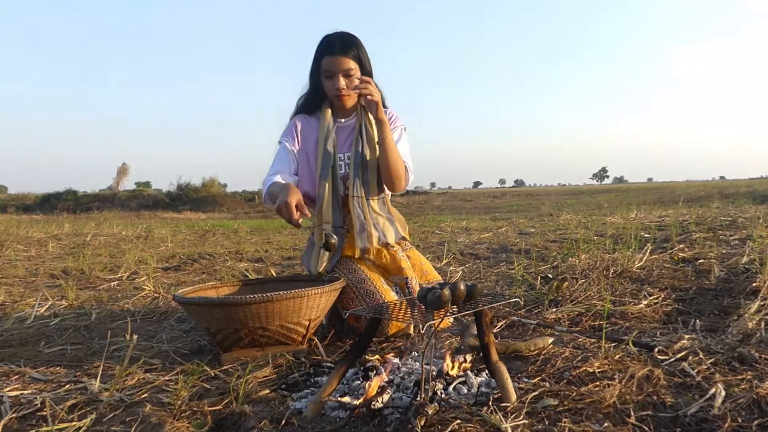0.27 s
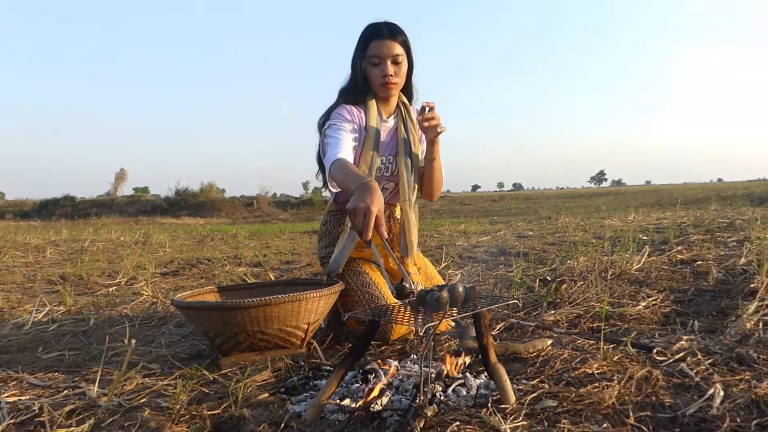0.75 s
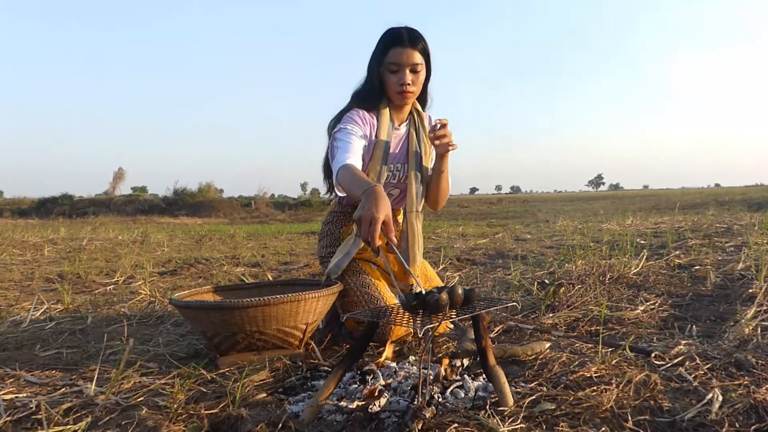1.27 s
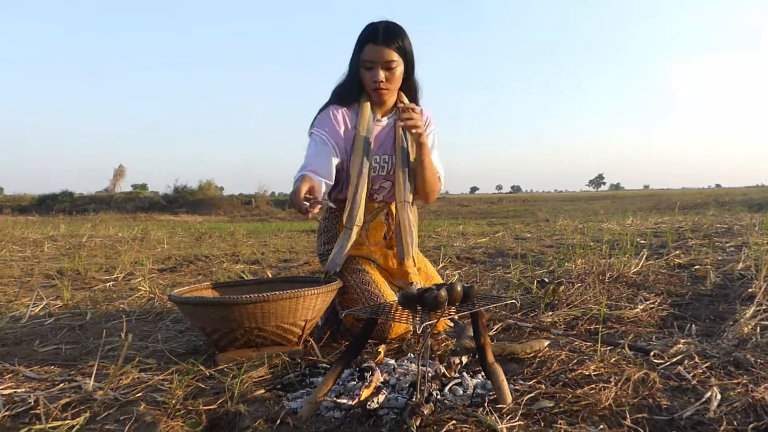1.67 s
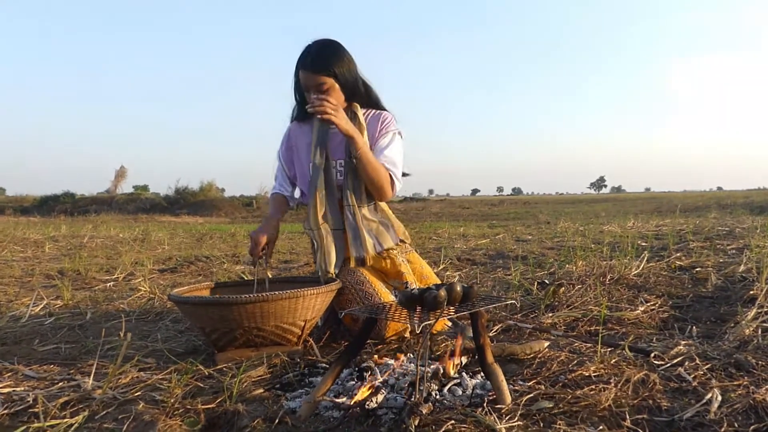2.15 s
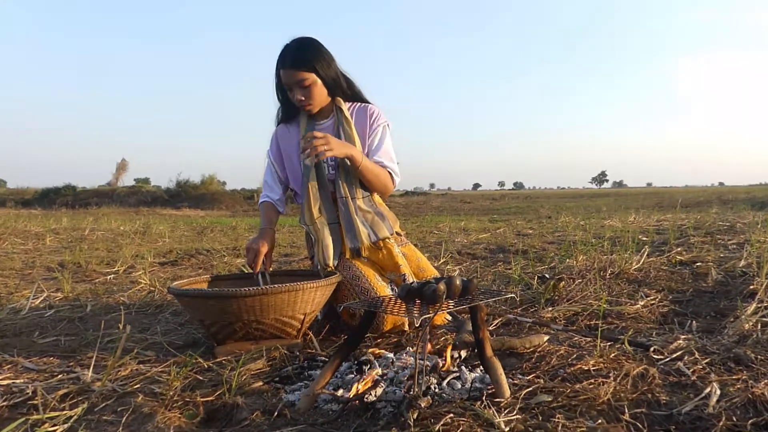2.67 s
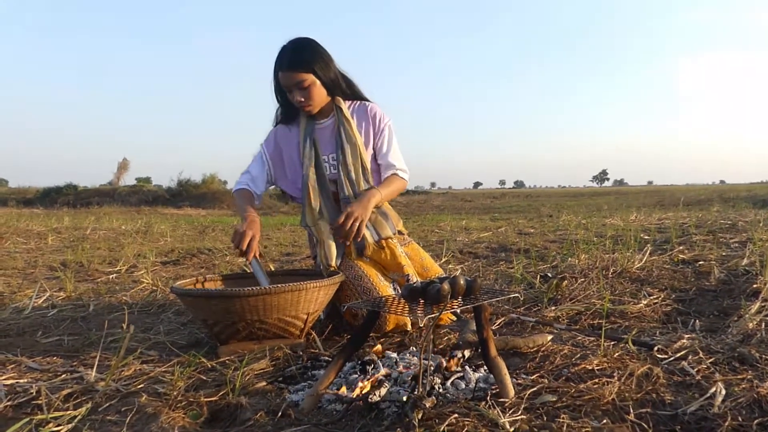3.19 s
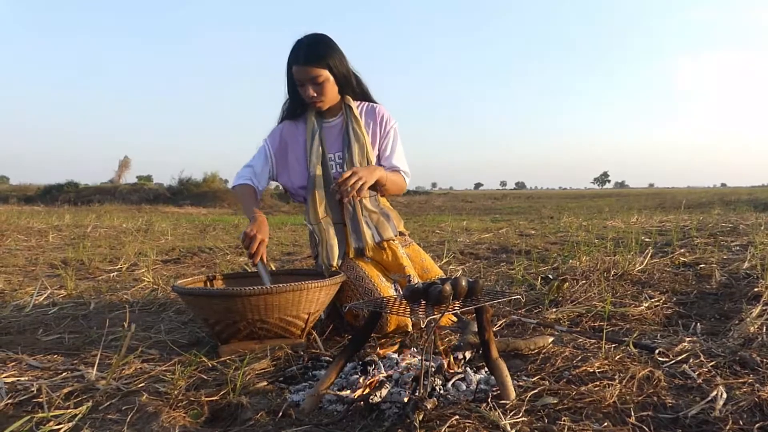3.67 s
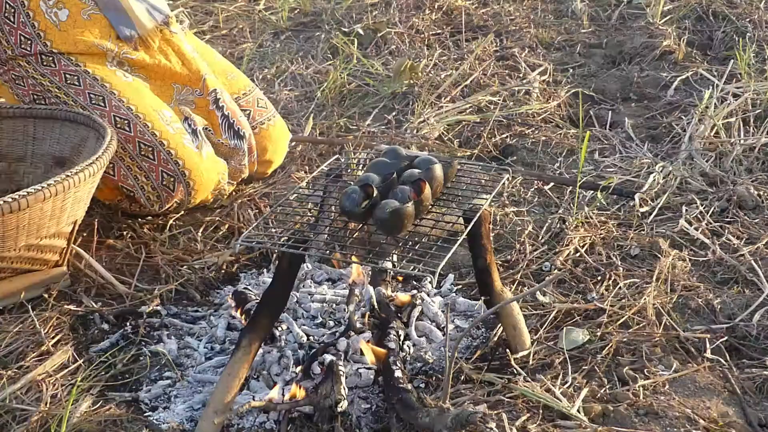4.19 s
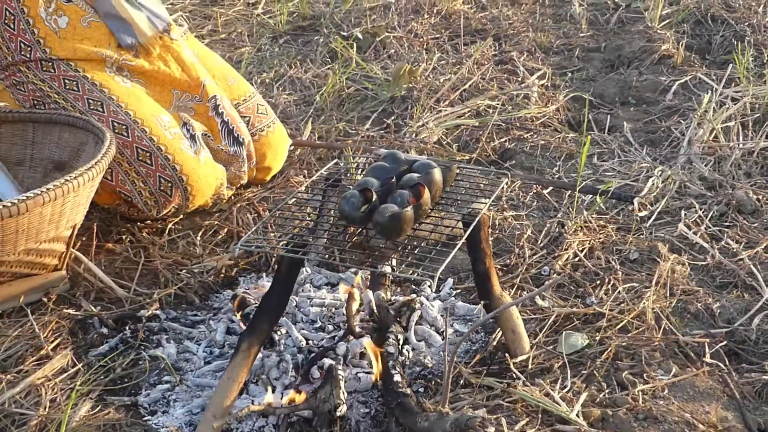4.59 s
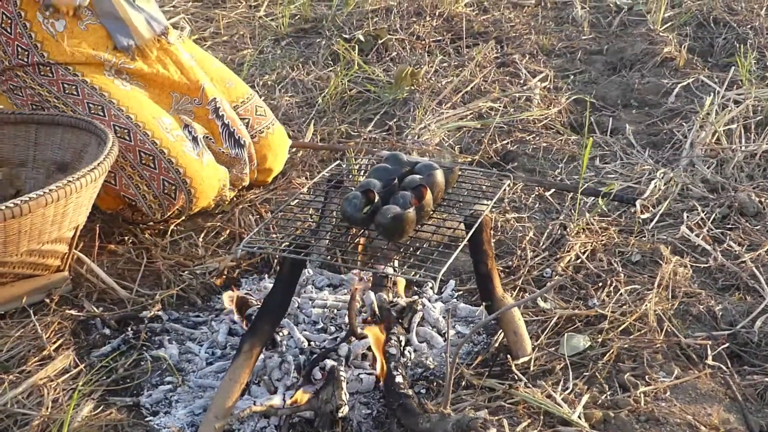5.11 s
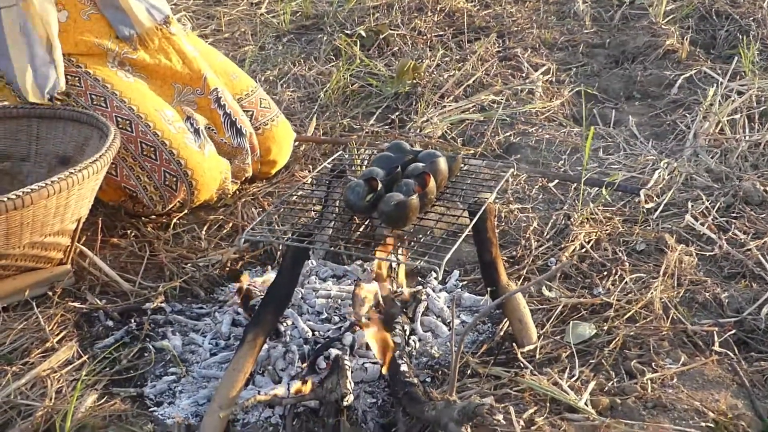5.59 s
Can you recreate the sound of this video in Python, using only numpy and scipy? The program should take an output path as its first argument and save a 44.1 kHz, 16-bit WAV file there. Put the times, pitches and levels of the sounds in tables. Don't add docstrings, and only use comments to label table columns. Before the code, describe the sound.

In an open field, small birds whistle short sliding notes and tick over soft wind, a faint drone and hiss. Metal tongs stir hard shells in a wicker basket, sparse at first, then in clattering, scraping bursts. After a quarter second of silence the air fades back in and a closer stereo microphone catches denser, louder clacks and ringing taps, with a soft puff of wind.

```python
import sys
import numpy as np
from scipy import signal
from scipy.fft import rfft
from scipy.io import wavfile
from scipy.ndimage import uniform_filter1d

SR = 44100
rng = np.random.default_rng(int(sys.argv[2]) if len(sys.argv) > 2 else 0)


def dump_mix(stems):
    frames = np.atleast_2d(stems).T
    limited = np.clip(frames, -1, 1)
    pcm = np.round(limited * 32767).astype(np.int16)
    wavfile.write(sys.argv[1], SR, pcm)


def convert_level_to_amplitude(level_db):
    exponent = np.asarray(level_db, float) / 20
    return 10 ** exponent


N = 257984

# f/Hz, level/dB per Hz
WIND_COLOUR = [(12, -61), (20, -47.5), (124, -4), (393, -7), (479, -2.5), (583, -12.5), (690, -17),
               (816, -10.5), (1140, -17), (1390, -15.5), (2580, -23.5), (5360, -26), (10200, -25),
               (15200, -32.5), (16500, -40.5)]
WIND_DB = -57.5
# f/Hz, likeness (-1 to 1)
WIND_LIKENESS = [(60, -0.24), (150, -0.63), (380, -0.76), (950, -0.62), (2380, -0.15), (5980, 0.38),
                 (15000, 0.45)]
# f/Hz, width/Hz, level/dB
DRONE = [
    (479, 60, -68),
    (807, 70, -79),
    (5240, 500, -78),
]
# t/s, bass lift/dB
PUFF = [
    (5.05, -1.5),
    (5.15, 10.5),
    (5.22, -1),
    (5.36, 22),
    (5.5, 8.5),
    (5.7, 1),
]
# t/s, level/dB
CLOSE_AIR = [
    (4.435, -90),
    (4.44, -32),
    (4.47, -7.5),
    (4.55, -3.5),
    (4.7, 3),
    (5.3, 3),
    (5.85, 5),
]
WIDE_AIR_DB, CHANGE_S, CHANGE_DB_PER_S = 3.5, 4.199, 1501.5

# t/s, length/s, middle f/Hz, end minus start f/Hz, level/dB
SLIDES = [(.63, .024, 3270, 300, -69), (1.262, .084, 3460, 200, -66), (1.5, .23, 3610, 680, -69),
          (1.86, .14, 3500, -250, -68), (2.69, .11, 3750, 50, -62), (3.65, .025, 4250, 500, -65),
          (3.695, .03, 4300, -1100, -65), (3.792, .022, 3450, 450, -62), (3.85, .028, 4450, -800, -63),
          (5.252, .016, 5350, -400, -60), (5.292, .014, 5450, -400, -58), (1.36, .026, 6300, -2600, -64),
          (.03, .03, 3350, 300, -68)]
# t/s, length/s, top f/Hz, end minus start f/Hz, level/dB
CHIRPS = [(.205, .077, 3640, 100, -59.5), (.666, 0.07, 3550, -170, -61.5), (.822, .03, 3380, 300, -69),
          (1.009, 0.064, 3600, -140, -60), (1.353, 0.089, 3700, 91, -63), (1.579, 0.051, 3600, -10, -57.5),
          (1.764, 0.066, 3680, -36, -61), (1.99, 0.043, 3760, -50, -61), (2.168, 0.07, 3770, -50, -60),
          (2.378, 0.062, 3850, -350, -56), (2.553, 0.078, 3900, 303.5, -57),
          (2.922, 0.066, 3950, -100, -50.5), (3.098, 0.05, 4030, -50, -50), (3.26, 0.091, 3900, 454, -53),
          (3.42, 0.076, 4110, 0, -55), (5.235, 0.023, 3820, -100, -62), (5.63, 0.041, 3790, -110, -58)]
# t/s, length/s, top f/Hz, end minus start f/Hz, level/dB
TWEETS = [
    (2.762, 0.038, 4300, -700, -55),
    (3.576, .046, 4670, -80, -47),
    (3.722, 0.017, 3640, 522, -59),
    (3.732, 0.05, 4610, -50, -49),
    (3.808, 0.036, 4600, 500, -62),
    (3.88, 0.043, 3920, 500, -52.5),
    (3.9, 0.036, 4670, -300, -50.5),
    (3.953, 0.044, 3800, 370, -58),
]
CHIRP_ARCH_HZ_PER_S, TWEET_ARCH_HZ_PER_S = 9500, 26000
# t/s, peak level/dB
TICKS = [(.194, -45), (.221, -48), (0.392, -42), (.4125, -49), (1.1728, -36), (1.207, -42), (1.2793, -45),
         (1.384, -41.5), (1.419, -49), (1.5873, -53), (1.7, -47.5), (1.774, -41.5), (2.144, -51.5),
         (2.744, -41.5), (3.76, -40), (3.949, -46)]
TICK_HZ, TICK_TOP_HZ, TICK_TOP_DB, TICK_T60 = 3900, 8700, -2.5, .01

# t/s, peak level/dB, main ring f/Hz, basket thud level/dB re peak,
# bright edge level/dB re peak Short contacts, with lone clicks away from the basket (1.3484, 1.515, 2.0312 s)
# and a bright crackle (1.301 s)
TAPS = [(1.0095, -35.5, 1500, -25, -2), (1.3484, -26.5, 1480, -62, -46), (1.515, -44, 3270, 4, 8),
        (2.4004, -31.5, 3200, -23, -9), (2.0312, -33.5, 4000, -17, -17.5), (2.7634, -37, 2360, -21, -21),
        (2.79, -20.5, 1500, -6, -45), (2.809, -29, 1020, -13, -43), (2.9195, -25.5, 2980, -16, -33),
        (1.301, -46, 9000, -40, 25), (3.0389, -25.5, 1230, -8.5, -53), (3.455, -36, 900, 0, -13),
        (3.6114, -35.5, 1440, -19, -14.5), (4.759, -36, 1050, -17, -24.5), (4.8045, -35, 3050, -15, -10),
        (4.9129, -11.5, 2350, -32, -9.5), (4.9318, -13.5, 3300, -22, -14.5), (4.9897, -15.5, 3670, -7, -29),
        (5.0635, -26, 2930, -15, -19), (5.428, -13, 3660, -28, -3.5), (5.4985, -14.5, 2830, -36, -32),
        (5.5315, -30, 2530, -4, -16), (3.549, -14, 4760, -39, -20), (5.6086, -31, 1786, 3, -34)]
KNOCKS = [(2.722, -38.5, 1290, 1, -27), (3.0608, -27.5, 2970, -34, -6.5), (3.0698, -36, 2430, -8, -28),
          (3.099, -30.5, 1950, -34, 1.5), (3.3471, -29, 1280, 6, 8), (3.3804, -26, 1260, -17, -6),
          (3.4994, -33, 4600, -5, -6), (3.5481, -16, 1640, 0.5, -15), (3.5776, -36.5, 1940, -3, -9),
          (.335, -49.5, 1210, -3, -42), (3.989, -32, 4880, -1.5, -4), (4.6515, -22.5, 3840, -6.5, -17.5),
          (4.6706, -29, 1565, -6, -22), (4.7077, -33, 2810, -16, -3), (4.7861, -27, 2990, -10, 5.5),
          (4.8173, -24.5, 3260, -7, -9), (4.8859, -28, 2480, 10, -29), (5.0008, -32, 2520, -15, -10),
          (5.1924, -34, 1460, -1, 0), (5.4588, -22, 1640, -5, -5), (5.6001, -34.5, 1690, -4, -40),
          (4.7425, -35, 2900, -21, -25), (5.8205, -19, 4700, -1.5, -0.5), (5.838, -20, 4630, -11, -3)]
CLACKS = [(2.2723, -27, 1960, 0, -4), (2.333, -22, 2000, -8, 7.5), (2.9136, -19.5, 6070, -16.5, -4.5),
          (2.9309, -27.5, 1295, -18, -16), (3.13, -32.5, 3610, -5, -33), (3.1522, -41, 2700, 4, -18),
          (3.3156, -35, 1540, -2, 5), (3.6306, -37, 1030, 4, -39), (4.0256, -32.5, 4640, -8, 9),
          (4.481, -33.5, 4070, -2.5, 5.5), (4.6845, -37.5, 4340, -4.5, -15.5),
          (4.8553, -26, 3650, -10, -14), (4.9069, -21, 2480, -21, -21), (5.0847, -22, 2160, -10.5, -10),
          (5.148, -14, 2980, -14, -15), (5.327, -28, 1100, 25, 14), (5.341, -31, 2900, -30, -31),
          (5.3823, -36.5, 1810, -3, -28), (5.4113, -25, 5830, -23, 3), (5.483, -37, 1540, -21, -3),
          (5.5138, -16, 1780, 1.5, -11), (5.5576, -16, 620, -5, -9), (5.7423, -16.5, 3900, -4.5, -8),
          (5.7785, -20.5, 3900, -8, -2.5)]
GRINDS = [(2.288, -34.5, 900, -8, -10), (2.3603, -36, 6800, 1.5, -1), (2.4763, -32.5, 1420, 1.5, 4),
          (2.54, -35.5, 1740, -6, -16), (2.637, -15.5, 1560, -5, -1), (2.6785, -25.5, 3700, -14, -12.5),
          (2.9684, -30, 1210, -5, -5), (3.3642, -28, 4500, -3, -5), (3.3934, -26, 1237, -1, -11),
          (3.4241, -26.5, 1000, -9, 0.5), (4.0465, -38, 4900, -11, -6), (4.078, -32, 4370, -21, 2),
          (4.105, -27.5, 1610, -13, 3), (4.6142, -36.5, 1070, -41, -3), (4.7256, -32.5, 2850, -11, -16),
          (4.8415, -23.5, 2220, -22, -12), (4.9667, -44, 1000, -34, 11), (4.9789, -26, 6800, -24, 7),
          (5.0518, -21, 4400, -11, -3), (5.3149, -27.5, 1060, -11, -8.5), (5.4492, -25.5, 3770, -27, -9),
          (5.7046, -32, 870, 15, -14), (5.7925, -23.5, 6100, 1, 4), (5.8091, -23.5, 3750, -7, -5)]
MORE_TAPS = [(1.0145, -38, 3150, -15, -16), (1.033, -43, 1500, -18, -14), (2.296, -47, 6100, -30, -17),
             (2.418, -45, 6200, -30, -15), (2.6465, -27, 1130, -12, -3), (2.825, -46, 3680, -25, -20),
             (2.955, -31, 1290, -13, -20), (2.996, -43, 3900, -25, -10), (3.135, -45, 6470, -22, -10),
             (5.3475, -37, 3520, -25, -6), (5.362, -39, 2480, -10, -8), (3.228, -43, 6030, -32, -14),
             (3.514, -44, 4500, -25, -11), (3.527, -47, 1500, -15, -20), (3.561, -25.5, 1700, 7, -25),
             (4.038, -41, 1500, -17, -8), (4.121, -41, 1500, -10, -15), (4.143, -43, 3200, -20, -21),
             (4.156, -52, 1700, -2, -19), (4.646, -28, 2970, -23, -4), (4.967, -27, 1730, -29, -12),
             (5.018, -29, 1830, -26, -19), (5.1535, -13.5, 3850, -9, -7.5), (5.1545, -15.5, 1840, -32, -15),
             (5.286, -49, 6550, -20, 1), (5.516, -15.5, 4600, -27, -26), (5.7035, -35.5, 4000, -30, -13),
             (5.7195, -42, 4460, -30, -18), (4.717, -41, 3080, -25, -25), (3.283, -46.5, 860, 16, -30)]
TAP_T60, KNOCK_T60, CLACK_T60, GRIND_T60, MORE_TAP_T60 = .011, .028, .034, .044, .012
# f/Hz, level/dB
SHELL_COLOUR = [(300, -27.5), (1250, 0), (5000, -5), (8500, -42.5), (16000, -62)]
BASKET_COLOUR = [(90, -41.5), (300, -7), (750, -1), (1600, -14), (4000, -60.5)]
RIM_COLOUR = [(2500, -31.5), (6000, -6), (11000, -10.5), (16000, -21)]
# f/Hz, width/Hz, level/dB
TONGS = [
    (1500, 300, -10.5),
    (2430, 160, -2),
    (3710, 27, 0.5),
    (3900, 39, -9.5),
    (4900, 35, -24.5),
]

# peak t/s, length/s, scrape level/dB, bright part level/dB re scrape, basket creak level/dB re scrape
DRAGS = [(1.018, 0.049, -41, 2, -19), (2.387, 0.15, -40.5, -12, -6), (2.56, 0.18, -48.5, -7, -1),
         (2.714, 0.22, -42.5, -12, -26), (2.9, 0.11, -63.5, 1, 12.5), (3.088, 0.28, -41.5, -10, -16),
         (3.25, 0.2, -61.5, -1, 8), (3.408, 0.11, -30.5, -23, -18), (3.453, 0.075, -34, 3, -31),
         (3.566, 0.16, -39, -11, -2.5), (3.746, 0.14, -46, -7, -11), (4.062, 0.085, -46, 3.5, -20),
         (4.108, 0.28, -37.5, -9, -5.5), (4.678, 0.15, -32.5, -7, -10), (4.828, 0.24, -38, -16, -25),
         (4.898, 0.12, -40, -10, 11.5), (4.988, 0.091, -29, -6, -4.5), (5.2, 0.08, -38, -32, -4),
         (5.37, 0.033, -38, -8, 6.5), (5.44, 0.27, -40.5, -4.5, -21), (5.508, 0.25, -42, -26, 1.5),
         (5.753, 0.4, -52.5, -15, 9), (5.85, 0.11, -25, -10, -3.5)]
DRAG_FADE_DB = 16.5
# t/s, length/s, f/Hz, level/dB
RUBS = [(1.01, 0.022, 3900, -45.5), (1.01, 0.024, 1500, -49), (2.295, 0.021, 6160, -57),
        (2.332, 0.013, 3900, -33), (2.475, 0.041, 1557, -57), (2.419, 0.024, 6150, -63),
        (2.68, 0.015, 1254, -39), (2.9193, 0.008, 3744, -21.5), (3.426, 0.026, 986, -40),
        (3.471, .026, 984, -51), (3.436, 0.028, 5950, -45), (3.442, 0.025, 4680, -46),
        (4.04, 0.09, 4800, -54), (4.07, 0.063, 7430, -49), (4.033, 0.061, 6100, -58),
        (4.114, 0.033, 1005, -47), (4.759, 0.022, 1036, -50), (5.431, 0.024, 8870, -45),
        (5.452, 0.022, 3720, -37), (5.52, 0.025, 3900, -38.5), (5.751, 0.014, 3900, -31)]
RUB_WAVER_DB = 4
# t/s, f/Hz, peak level/dB
PINGS = [(2.272, 3170, -37), (2.3334, 3050, -31), (2.3355, 1940, -29), (2.336, 6900, -30.5),
         (2.637, 11400, -23.5), (2.638, 5350, -29.5), (2.9119, 1650, -34), (3.06, 2510, -36),
         (3.3645, 2620, -30.5), (3.3638, 1300, -34), (3.3807, 4330, -39), (3.3936, 4700, -31.5),
         (3.5463, 2406, -25), (4.103, 3210, -31.5), (4.8405, 4630, -26.5), (4.8423, 1015, -33.5),
         (4.8501, 900, -36), (4.9097, 12900, -26.5), (4.9111, 3664, -16.5), (4.9133, 770, -27),
         (4.912, 6740, -33), (4.93, 2307, -16.5), (4.9332, 714, -34.5), (4.9815, 6700, -37),
         (4.9894, 5350, -29), (4.9886, 4490, -22.5), (4.9891, 7660, -37), (5.0507, 3600, -32),
         (5.0511, 12400, -36), (5.0511, 4550, -38), (5.052, 6030, -28), (5.0518, 13440, -35),
         (5.0546, 8940, -32), (5.057, 2450, -26), (5.0636, 5200, -39), (5.1497, 6680, -31),
         (5.191, 3810, -31.5), (5.4271, 9570, -16.5), (5.4278, 1020, -31), (5.427, 7500, -23),
         (5.4273, 1824, -29.5), (5.4316, 6160, -26), (5.4458, 8700, -32), (5.4491, 1450, -35),
         (5.4982, 1590, -25.5), (5.512, 3747, -17), (5.5149, 3210, -20), (5.5326, 3760, -32),
         (5.5563, 5070, -29.5), (5.558, 1745, -24), (5.7425, 9060, -28.5), (5.777, 4870, -24.5),
         (5.7824, 1060, -32), (5.7916, 13200, -29), (5.7913, 2240, -33), (5.7927, 5460, -38),
         (5.7973, 593, -30.5), (5.8195, 3960, -22), (5.838, 4800, -19), (5.8377, 1950, -28)]
PING_RISE_S, PING_T60, PING_DULLING = .0006, .022, .25
PING_WAVER_DB, PING_WAVER_RAD = 2.5, .6
CHATTER_S, CHATTER_LENGTH_S, CHATTER_PER_S, CHATTER_HZ, CHATTER_DB = 3.832, .15, 130, 2100, -58


def evened(x):
    return x / np.sqrt(np.mean(x ** 2) + 1e-20)


def read(points, hz):
    f, value = np.transpose(points)
    return np.interp(np.log(hz + 1), np.log(f + 1), value)


def add(mix, s, sound):
    part = mix[round(s * SR):][:len(sound)]
    part += sound[:len(part)]


def resonate(x, hz, width):
    return signal.lfilter(*signal.iirpeak(hz, hz / width, SR), x)


def field():
    frames, hz = N // 256 + 5, np.fft.rfftfreq(1024, 1 / SR)
    a, b, c, d, patches = rng.standard_normal((frames, 513, 5)).T
    patches = evened(uniform_filter1d(uniform_filter1d(patches, 10, 0), 12, 1))
    gusts = evened(uniform_filter1d(rng.standard_normal(frames), 12))
    gusts = gusts / (1 + (hz[:, None] / 350) ** 2)
    puff_db = np.interp(np.arange(frames) * 256 / SR, *np.transpose(PUFF))
    puff_db = puff_db / (1 + (hz[:, None] / 170) ** 2)
    same = np.clip(read(WIND_LIKENESS, hz), -1, 1)[:, None]
    left = a + 1j * b
    right = same * left + np.sqrt(1 - same ** 2) * (c + 1j * d)
    colour_db = read(WIND_COLOUR, hz)[:, None]
    spectrum = np.array([left, right]) * convert_level_to_amplitude(colour_db + 1.1 * patches + 2.8 * gusts + puff_db)
    wind = signal.istft(spectrum, nperseg=1024, noverlap=768)[1][:, :N]
    wind = convert_level_to_amplitude(WIND_DB) * evened(wind)
    noise, drone = rng.standard_normal(N), np.zeros(N)
    for f, width, db in DRONE:
        drone += convert_level_to_amplitude(db) * evened(resonate(resonate(noise, f, width), f, width))
    return wind * convert_level_to_amplitude([[.6], [-.6]]) + drone * convert_level_to_amplitude([[.7], [-.7]])


def birds():
    out = np.zeros(N)
    flutter_db = 3 * evened(uniform_filter1d(rng.standard_normal(N), size=200))
    singers = [(CHIRPS, CHIRP_ARCH_HZ_PER_S, 1.7), (TWEETS, TWEET_ARCH_HZ_PER_S, 5), (SLIDES, 0, 1)]
    for notes, arch, flatness in singers:
        for s, length, top_hz, slant, db in notes:
            u = np.linspace(-1, 1, round(length * SR))
            hz = top_hz + u * slant / 2 - arch * length * abs(u) ** flatness
            tone = np.sin(2 * np.pi * np.cumsum(hz) / SR)
            breath = convert_level_to_amplitude(db + 3 + flutter_db[:len(u)]) * (1 - u ** 2) ** 1.4
            add(out, s, breath * tone)
            flutter_db = flutter_db[len(u):]
    t = np.arange(900) / SR
    ring = np.sin(2 * np.pi * TICK_HZ * t) + convert_level_to_amplitude(TICK_TOP_DB) * np.sin(2 * np.pi * TICK_TOP_HZ * t)
    for s, db in TICKS:
        add(out, s, convert_level_to_amplitude(db - 60 * t / TICK_T60) * ring * np.minimum(t / .0002, 1))
    return out


def clack(peak_db, hz, thud_db, edge_db, t60, luck):
    size = len(luck)
    t, bins = np.arange(size) / SR, np.fft.rfftfreq(size, 1 / SR)
    octaves = np.log2((bins + 1) / hz)
    dull_db = .25 * max(-edge_db - 30, 0)
    slope_db = np.where(octaves > 0, 2.5 + dull_db, -3.5 - dull_db)
    skirt = convert_level_to_amplitude(-5 - slope_db * octaves + read(SHELL_COLOUR, bins))
    basket = convert_level_to_amplitude(thud_db + read(BASKET_COLOUR, bins))
    rim = convert_level_to_amplitude(edge_db + read(RIM_COLOUR, bins))
    lumps = evened(np.interp(22 * np.log(bins + 1500), np.arange(size), luck[:, 1]))
    main_ring = convert_level_to_amplitude(3) / (1 + ((bins - hz) / 150) ** 2)
    shell = (skirt + basket + rim) * convert_level_to_amplitude(2.8 * lumps) + main_ring
    grit = luck[:, 0] * convert_level_to_amplitude(-60 * t / (.94 * t60)) * np.minimum(t / .00048, 1)
    shell = shell / uniform_filter1d(abs(rfft(grit)), size=30)
    both_sides = np.r_[shell, shell[-2:0:-1]]
    response = np.exp(np.conj(signal.hilbert(np.log(both_sides + 1e-5))))
    sound = np.fft.ifft(np.fft.fft(grit) * response).real
    return convert_level_to_amplitude(peak_db - 4) * sound / np.sqrt(uniform_filter1d(sound ** 2, size=66).max())


def shells():
    out = np.zeros(N)
    kinds = [(TAPS, TAP_T60), (KNOCKS, KNOCK_T60), (CLACKS, CLACK_T60), (GRINDS, GRIND_T60),
             (MORE_TAPS, MORE_TAP_T60)]
    for hits, t60 in kinds:
        for (s, *blow), luck in zip(hits, rng.standard_normal((len(hits), 3072, 2))):
            add(out, s - .0008, clack(*blow, t60, luck))
    out = out + sum(convert_level_to_amplitude(db) * resonate(out, hz, width) for hz, width, db in TONGS)
    t = np.arange(3000) / SR
    wall = rng.standard_normal(3000) * convert_level_to_amplitude(-60 * t / .18) * (t > .003)
    wall = signal.sosfilt(signal.butter(1, 3500, fs=SR, output="sos"), wall)
    return out + convert_level_to_amplitude(-26.5) * signal.oaconvolve(out, wall / np.linalg.norm(wall))[:N]


def slips(lo_hz, hi_hz, per_s, cycles, clumps):
    out = np.zeros(N)
    for hz in np.geomspace(lo_hz, hi_hz, num=12):
        u = np.arange(0, 3 * cycles, hz / SR)
        knock = np.sin(2 * np.pi * u) * u * np.exp(-3 * u / cycles) * np.sqrt(hz)
        train = (rng.random(N) < per_s / SR) * rng.standard_normal(N) * convert_level_to_amplitude(3.2 * clumps)
        out += signal.oaconvolve(train, knock)[:N]
    return evened(out)


def scrape():
    t, push = np.arange(N) / SR, np.zeros((3, N))
    clumps = evened(uniform_filter1d(rng.standard_normal(N), size=300))
    body = slips(953, 5500, 700, 6.1, clumps)
    bright = slips(6300, 14000, 500, 20.5, clumps)
    creak = slips(305, 840, 90, 1.8, clumps)
    for s, length, db, bright_db, creak_db in DRAGS:
        near = slice(max(round((s - 2 * length) * SR), 0), round((s + 2 * length) * SR))
        swell = convert_level_to_amplitude(db - 9 - DRAG_FADE_DB * 2 * abs(t[near] - s) / length)
        push[:, near] += swell * convert_level_to_amplitude([[0], [bright_db], [creak_db]])
    heard = (t < 4.3) | (t > 4.613)
    return (push * np.array([body, bright, creak])).sum(axis=0) * heard


def rubs():
    out = np.zeros(N)
    for (s, length, hz, db), luck in zip(RUBS, rng.standard_normal((len(RUBS), 4096))):
        t = np.arange(0, length, 1 / SR)
        waver = evened(uniform_filter1d(luck, size=90))[:len(t)]
        swell = np.sqrt(np.sin(np.pi * (t / t[-1]) ** .7) ** 2)
        tone = np.sin(2 * np.pi * hz * t + .5 * waver[::-1])
        add(out, s, convert_level_to_amplitude(db + 3 + RUB_WAVER_DB * waver) * tone * swell)
    return out


def pings():
    out, t = np.zeros(N), np.arange(2048) / SR
    for (s, hz, db), luck in zip(PINGS, rng.standard_normal((len(PINGS), 2, 2048))):
        t60 = PING_T60 * (hz / 2500) ** -PING_DULLING
        waver = evened(uniform_filter1d(luck, size=40))
        tone = np.sin(2 * np.pi * hz * t + PING_WAVER_RAD * waver[1])
        fade = convert_level_to_amplitude(db - 60 * t / t60 + PING_WAVER_DB * waver[0])
        add(out, s, 2 * fade * (1 - np.exp(-t / PING_RISE_S)) * tone)
    return signal.sosfilt(signal.butter(2, 350, "high", fs=SR, output="sos"), out)


def chatter():
    t = np.arange(0, CHATTER_LENGTH_S, 1 / SR)
    uneven = evened(uniform_filter1d(rng.standard_normal(len(t)), size=400))
    ribs = np.cumsum(CHATTER_PER_S * (1 + .37 * uneven)) / SR
    ticks = rng.standard_normal(len(t)) * np.exp(-(ribs % 1) / .27)
    hollow = resonate(resonate(ticks, CHATTER_HZ, 1400), CHATTER_HZ, 1500)
    out = np.zeros(N)
    add(out, CHATTER_S, convert_level_to_amplitude(CHATTER_DB) * evened(hollow))
    return out


def ports(x, tilt_db, spread_db):
    low = signal.sosfilt(signal.butter(1, 7500, fs=SR, output="sos"), x)
    scatter = rng.standard_normal(400) * convert_level_to_amplitude(-60 * np.arange(400) / SR / .012)
    scatter = signal.oaconvolve(x, scatter / np.linalg.norm(scatter))[:N]
    tilt = convert_level_to_amplitude([[tilt_db], [-tilt_db]])
    return low * tilt + (x - low) / tilt + convert_level_to_amplitude(spread_db) * scatter * [[1], [-1]]


def scene():
    t = np.arange(N) / SR
    dropping_db = -17 - CHANGE_DB_PER_S * (t - CHANGE_S)
    wide_db = np.where(t < CHANGE_S, WIDE_AIR_DB, np.where(t < 4.218, dropping_db, -90))
    close_db = np.interp(t, *np.transpose(CLOSE_AIR))
    air = field() * convert_level_to_amplitude(np.maximum(wide_db, close_db))
    singing = ports(birds(), .8, -14)
    heard = (t < 4.2) | (t > 4.45)
    basket = ports(shells() + scrape() + rubs() + chatter(), 1.9, -16) * heard
    return basket + singing + ports(pings(), 1.9, -14) + air


def low_pass(x):
    return signal.sosfilt(signal.butter(12, 16800, fs=SR, output="sos"), x)


def record(dry):
    limited = signal.oaconvolve(dry, signal.firwin(255, 15900, fs=SR)[None], "same")
    limited = limited - .41 * resonate(limited, 7600, 490)
    return low_pass(limited)


dry = scene()
out = record(dry)
dump_mix(out)
```